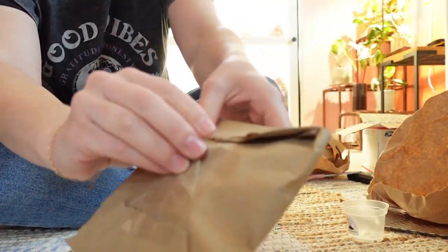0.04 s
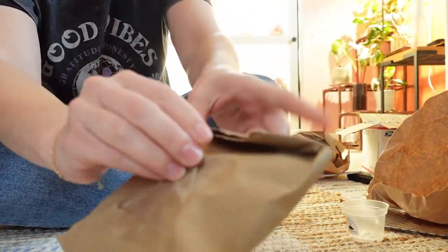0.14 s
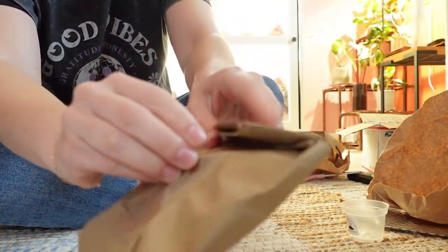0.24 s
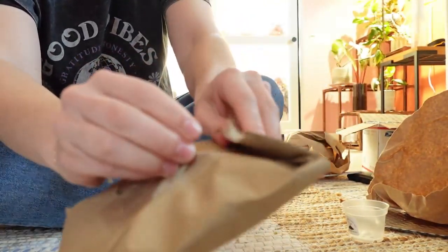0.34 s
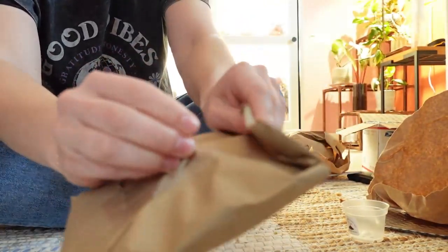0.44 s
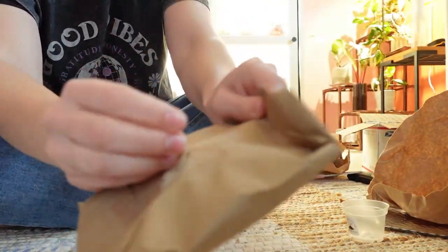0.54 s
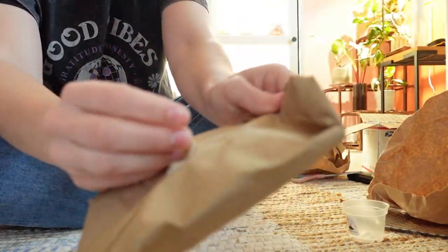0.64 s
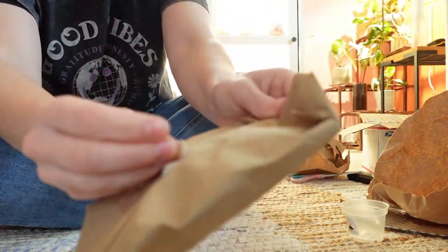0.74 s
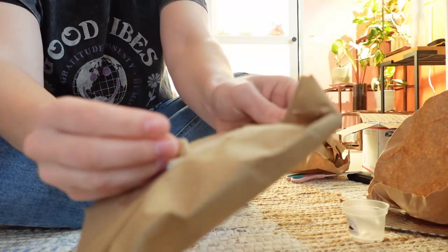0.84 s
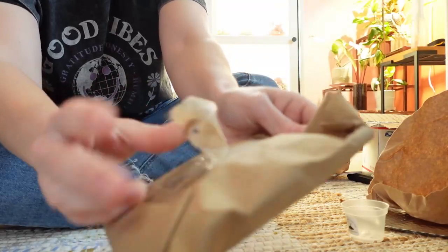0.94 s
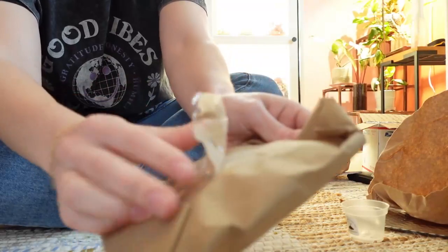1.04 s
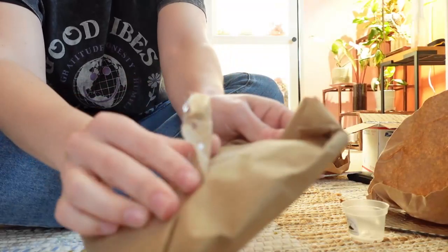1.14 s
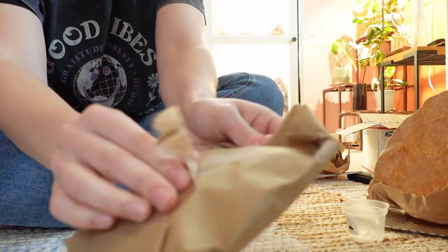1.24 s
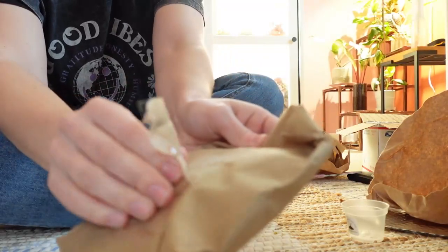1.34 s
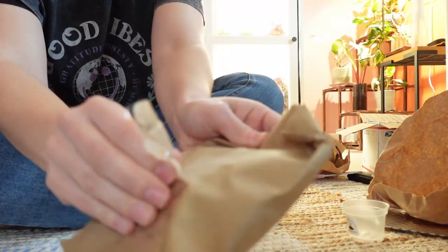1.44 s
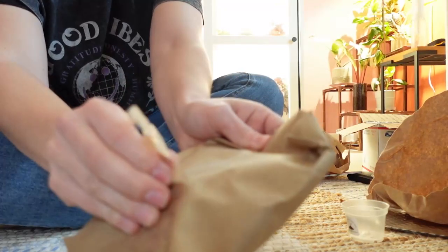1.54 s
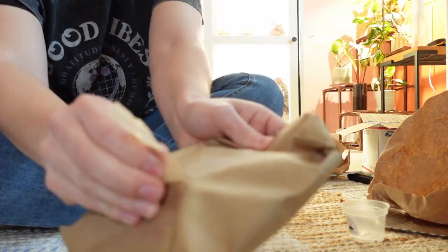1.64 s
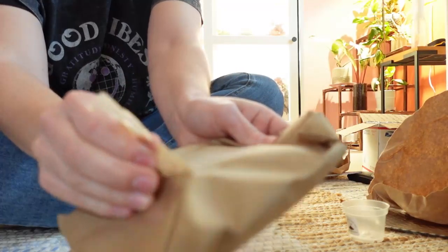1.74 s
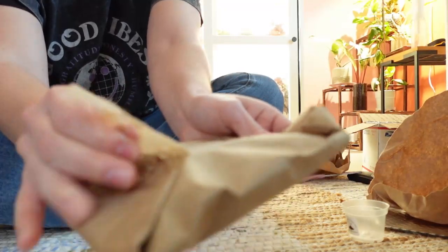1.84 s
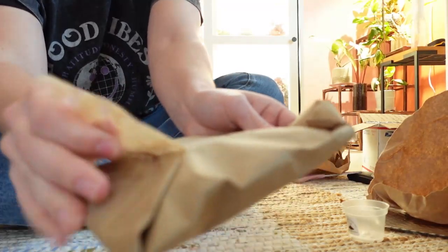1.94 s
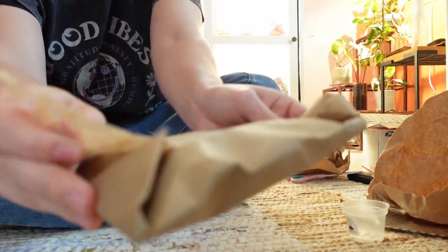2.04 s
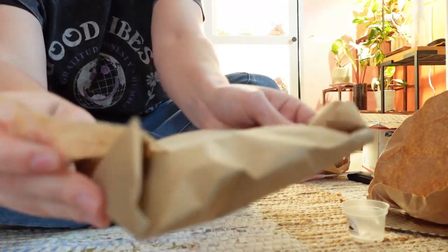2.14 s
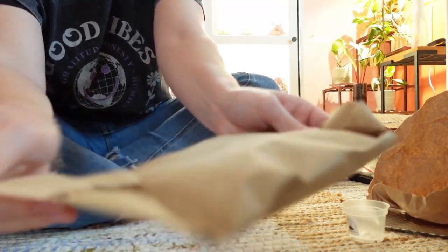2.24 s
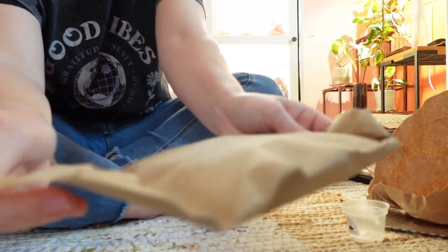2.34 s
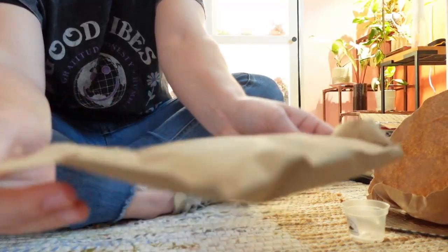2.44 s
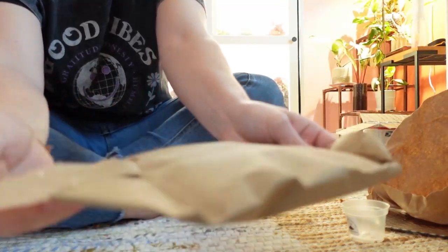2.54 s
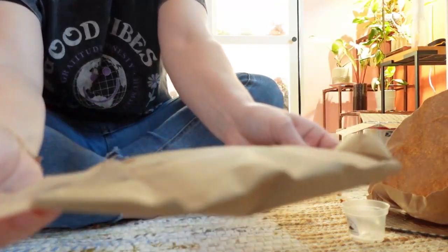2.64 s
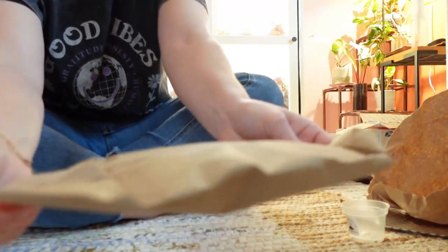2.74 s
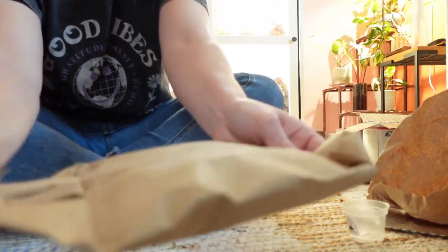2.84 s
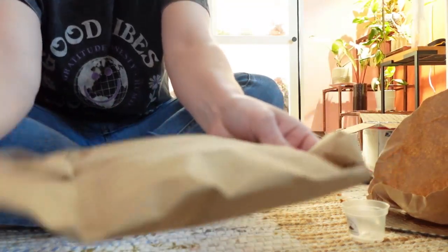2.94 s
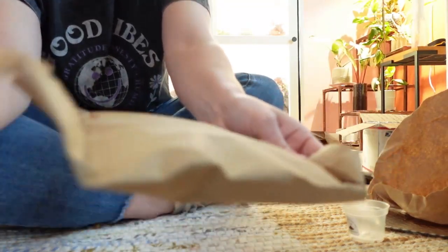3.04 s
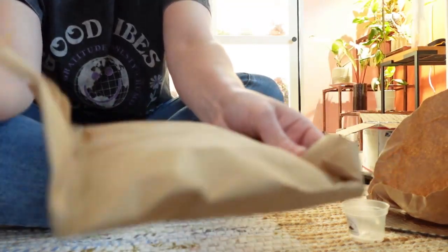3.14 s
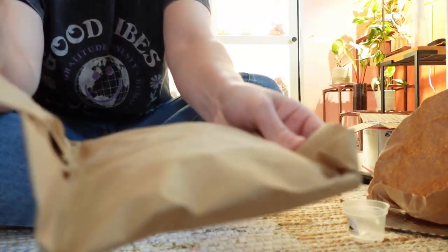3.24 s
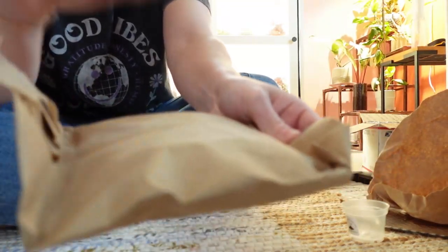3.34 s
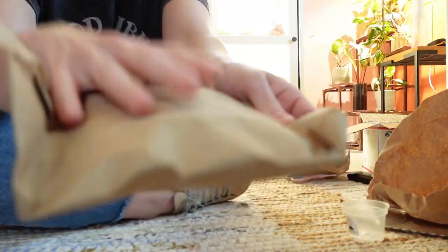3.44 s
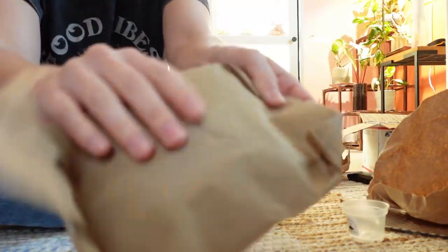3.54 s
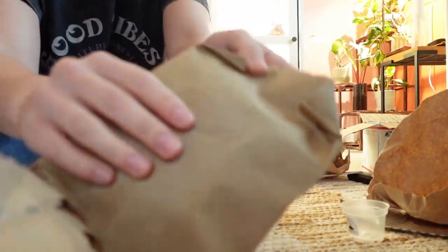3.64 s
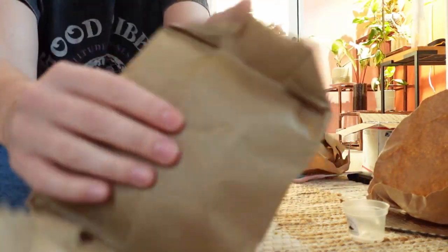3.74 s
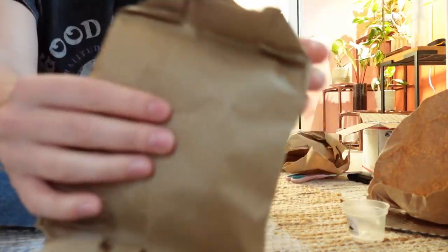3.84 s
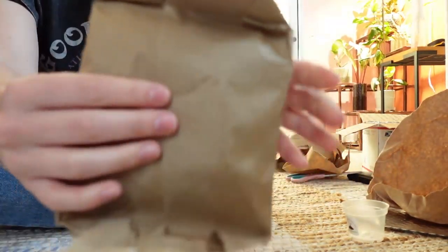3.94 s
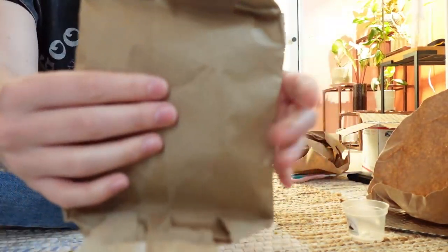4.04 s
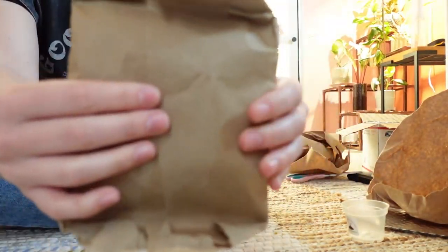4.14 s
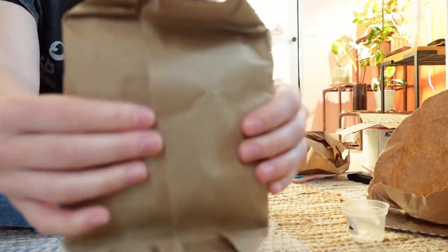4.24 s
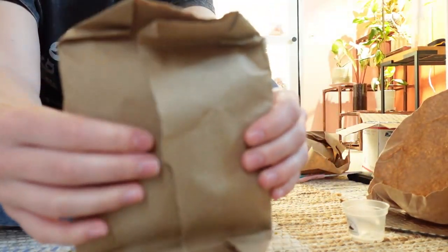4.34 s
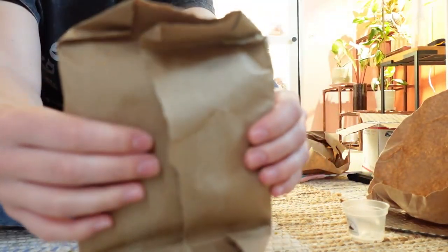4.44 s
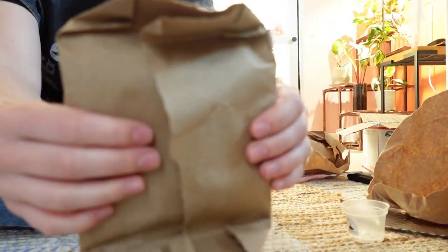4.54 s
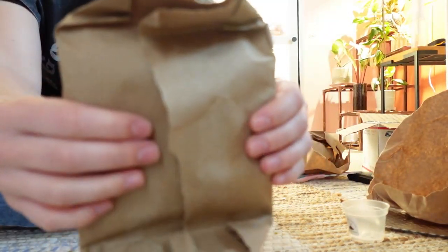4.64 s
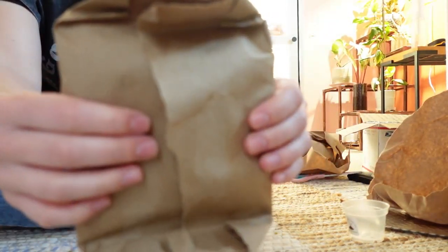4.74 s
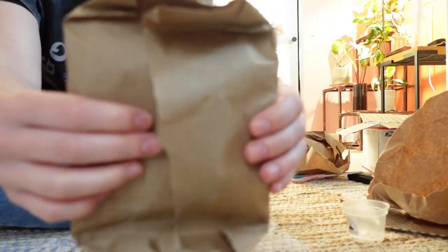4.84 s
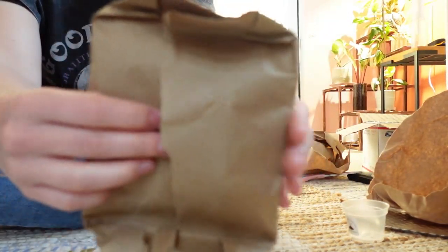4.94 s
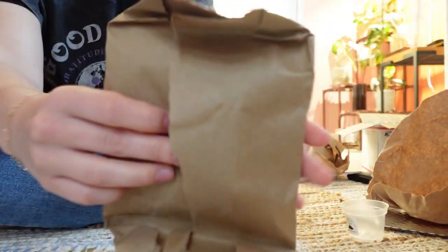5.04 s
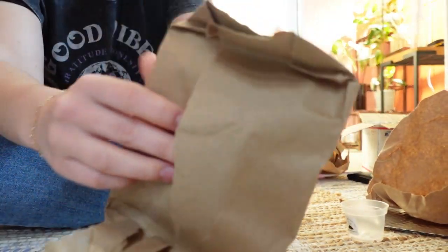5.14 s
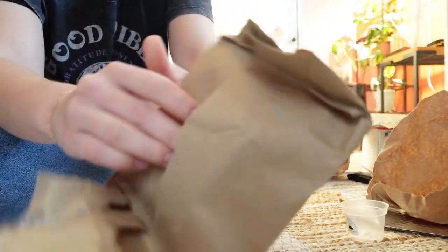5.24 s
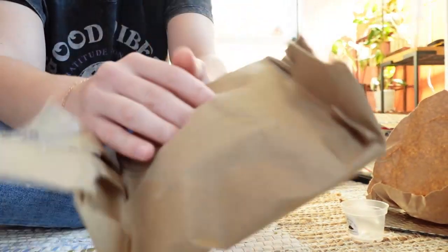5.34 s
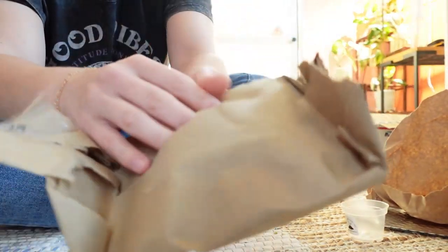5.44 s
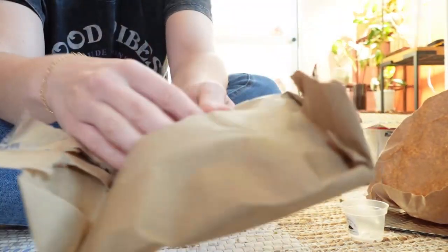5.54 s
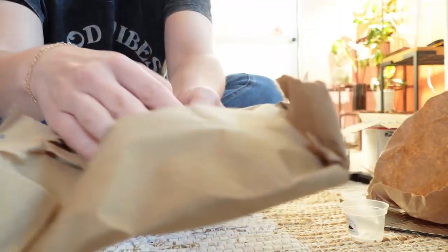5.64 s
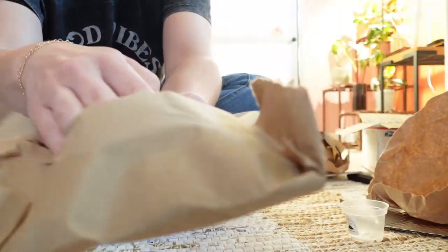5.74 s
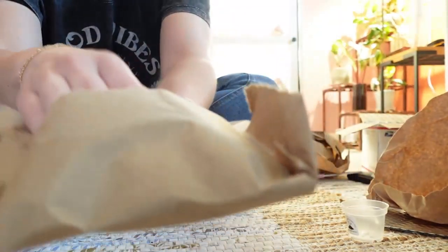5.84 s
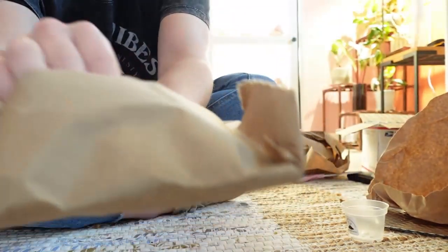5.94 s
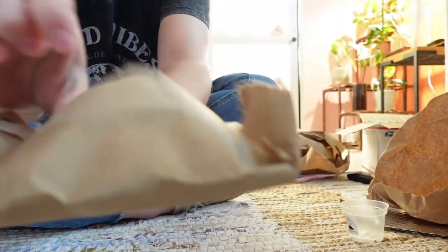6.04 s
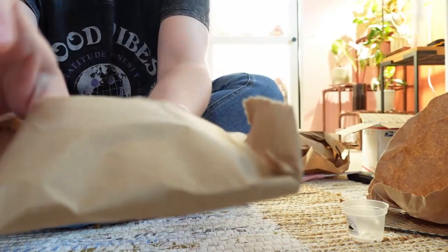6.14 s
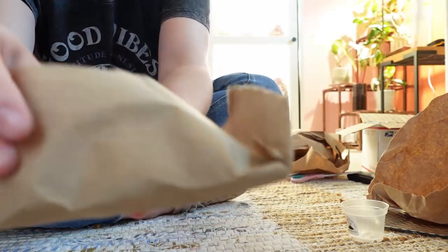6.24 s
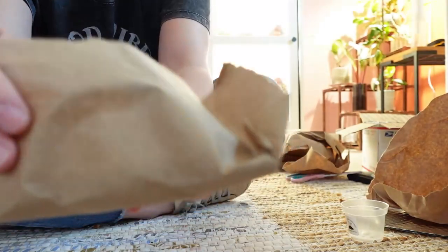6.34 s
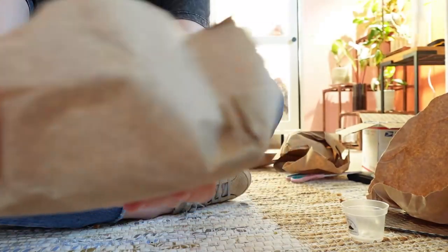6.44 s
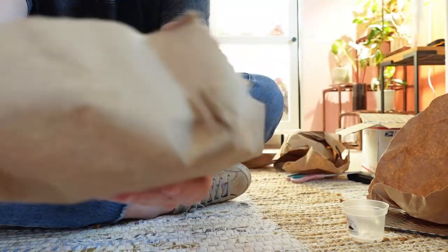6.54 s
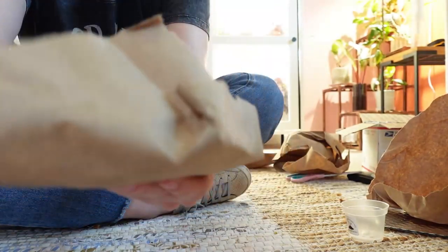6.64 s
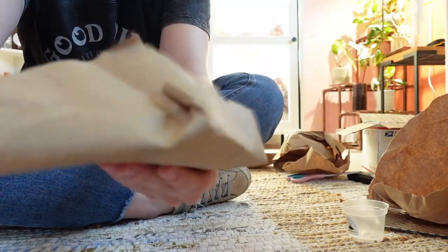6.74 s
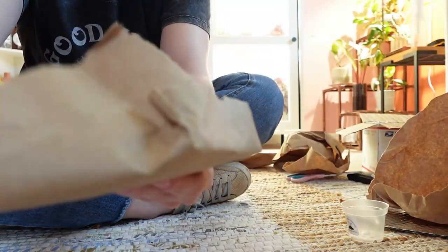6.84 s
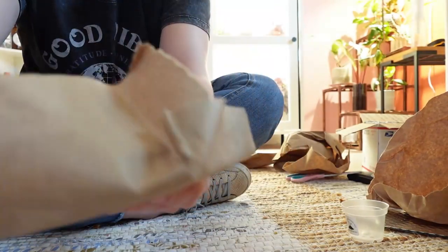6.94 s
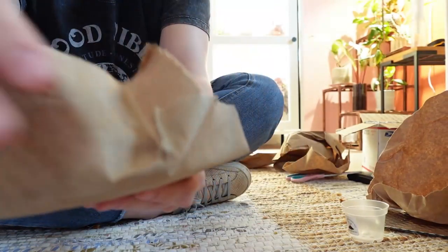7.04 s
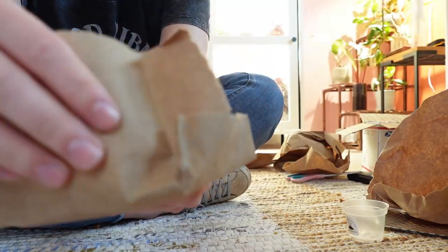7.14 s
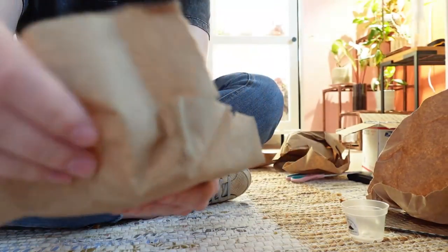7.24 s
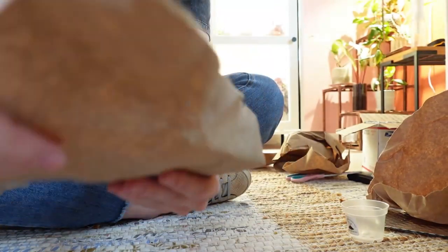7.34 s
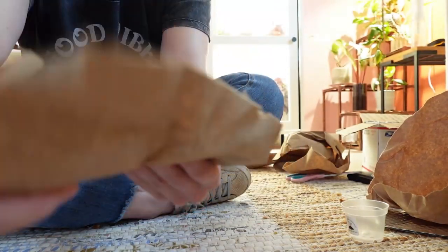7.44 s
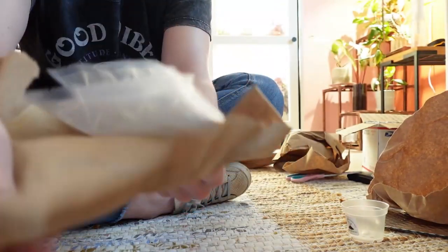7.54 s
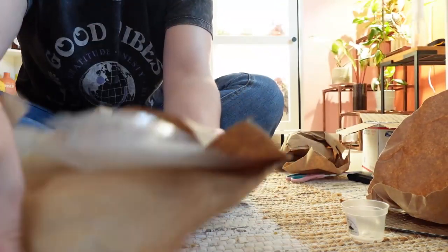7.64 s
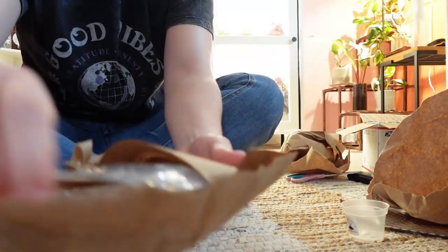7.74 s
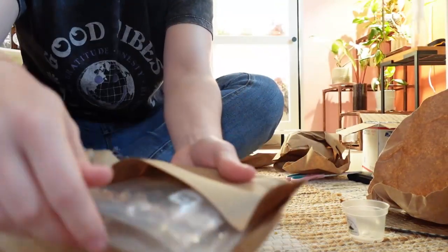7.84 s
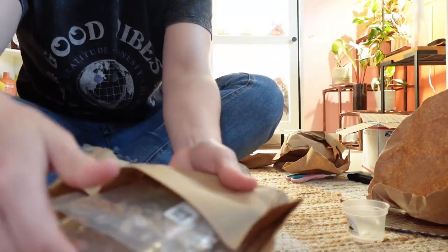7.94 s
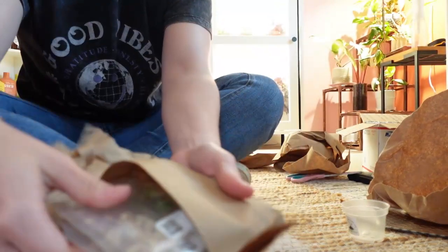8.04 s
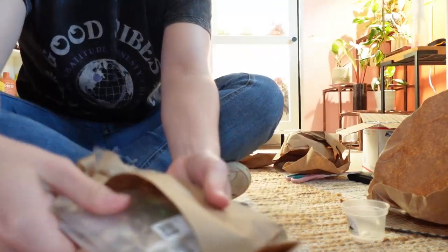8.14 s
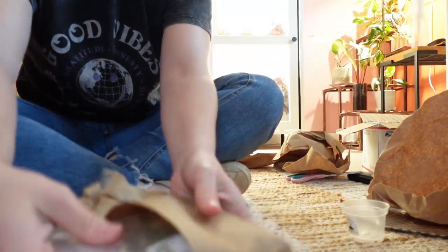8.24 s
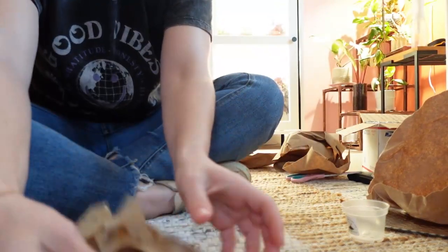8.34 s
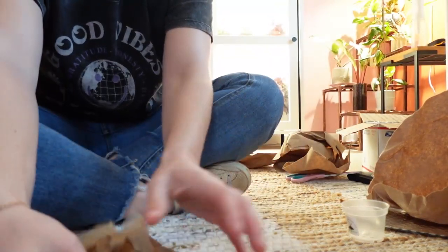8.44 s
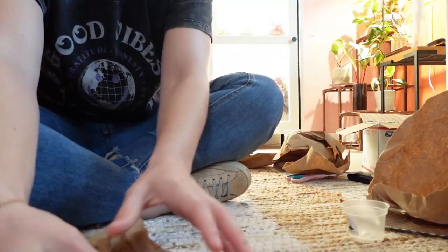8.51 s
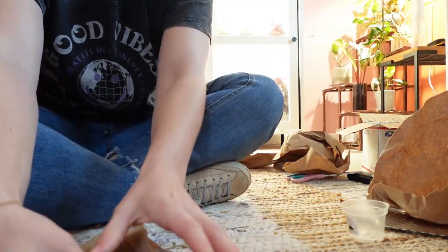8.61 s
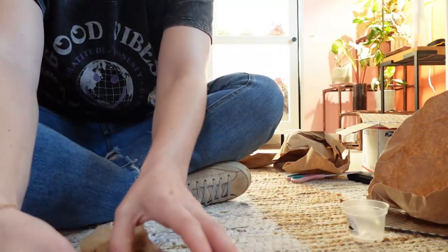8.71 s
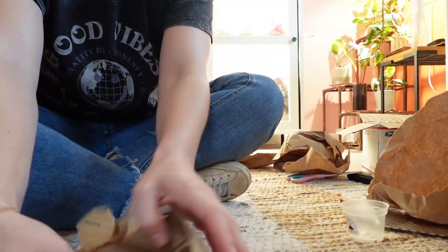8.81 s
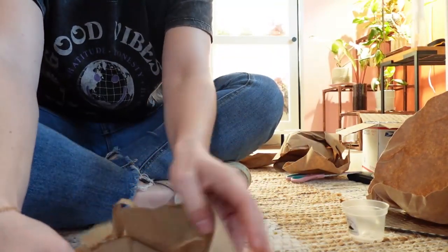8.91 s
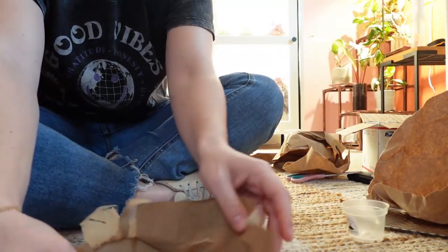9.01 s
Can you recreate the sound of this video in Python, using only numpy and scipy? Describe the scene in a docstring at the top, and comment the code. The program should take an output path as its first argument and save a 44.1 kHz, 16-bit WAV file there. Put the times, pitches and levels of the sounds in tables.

```python
"""A paper bag is handled close by in a quiet room: hands tear off a strip, turn the bag and pull it open.
Creases buckle in sharp snaps: kicks and short noise bursts that ring through filters.
Each move of the hands adds a rustle of tiny crackles and smooth sliding noise.
The tear is a dense stream of breaking fibres, with a broad ring that glides down.
The room adds a short, faint tail and still air."""
import sys
import numpy as np
from scipy import signal
from scipy.fft import rfft, irfft, next_fast_len
from scipy.io import wavfile
from scipy.ndimage import uniform_filter1d, map_coordinates

SR = 44100
rng = np.random.default_rng(int(sys.argv[2]) if len(sys.argv) > 2 else 0)


def write(x):
    x = np.atleast_2d(x).T
    wavfile.write(sys.argv[1], SR, np.round(np.clip(x, -1, 1) * 32767).astype(np.int16))


N = 400016  # length in samples
TIME = np.arange(N) / SR
TAPS = 2048  # length in samples of filters and short sounds
HZ = np.fft.rfftfreq(TAPS, 1 / SR)
LEAD = 128  # samples of lead-in before the kick


def amp(db):
    """Turns decibels into gain."""
    return 10 ** (np.asarray(db) / 20)


def evened(x):
    """Scales to rms 1."""
    return x / np.sqrt(np.mean(x ** 2) + 1e-20)


def read(points, hz):
    """Reads a table of values per frequency, in straight lines on a log-frequency axis."""
    f, value = np.transpose(points)
    return np.interp(np.log(hz + 1), np.log(f), value)


def add(mix, s, sound):
    """Mixes a sound in at s seconds."""
    part = mix[max(round(s * SR), 0):][:len(sound)]
    part += sound[:len(part)]


def coloured(x, gain):
    """Filters with the given gain at each of HZ, without pre-echo (minimum phase), so attacks stay sharp."""
    log_gain = np.log(np.r_[gain, gain[-2:0:-1]] + 1e-5)
    minimum_phase = np.exp(np.conj(signal.hilbert(log_gain)))
    taps = np.fft.ifft(minimum_phase).real
    return signal.oaconvolve(x, taps)[:len(x)]


def facet(hz, q):
    """Gain at each of HZ of one stiff patch of paper: a broad resonance."""
    return 1 / np.hypot(1, q * ((HZ + 1) / hz - hz / (HZ + 1)))


def buckle(t, flip_s=0.0013, shiver_db=-21, lead_db=-11):
    """Envelope of a crease that gives way at t = 0: a very short swell, a rattle, a weak shiver of the sheet."""
    lead_s, shiver_s = 0.0007, 0.005
    before = amp(lead_db) * np.exp(-abs(t) / lead_s)
    after = np.exp(-abs(t) / flip_s) + amp(shiver_db) * np.exp(-abs(t) / shiver_s)
    return np.where(t < 0, before, after)


# The creases that stand out. Each row: time of the flip in seconds, level over its first 5 ms in dB
# (before a trim shared by all), pitch in Hz of the paper facet that flips.
SNAPS = [(0.033, -16.5, 3240), (0.038, -15.5, 7000), (.063, -16.5, 2300), (0.075, -16, 2890),
         (0.0927, -19.5, 3400), (0.1043, -15, 5160), (0.121, -14, 6500), (0.1446, -14, 3880),
         (0.2125, -12.5, 2300), (0.2162, -14, 3830), (0.235, -16.5, 4700), (.2478, -22, 2600),
         (.282, -16.5, 7500), (0.305, -14, 4760), (.327, -17, 2880), (0.3858, -15.5, 1990),
         (0.415, -18.5, 1660), (0.4455, -22, 2700), (0.467, -19.5, 2800), (0.5346, -14, 4870),
         (.573, -13, 4100), (.584, -13.5, 4500), (0.617, -15, 2410), (.6269, -12.5, 6600),
         (.6763, -18, 3100), (0.6811, -13, 2600), (.718, -13.5, 3860), (0.8295, -15.5, 1490),
         (0.911, -17, 6100), (0.96, -12.5, 4050), (.967, -15, 2640), (0.981, -20, 4800),
         (1.0013, -14.5, 2970), (1.0752, -15.5, 4970), (1.0901, -24, 2200), (1.1266, -17.5, 3530),
         (1.2231, -19.5, 2460), (1.269, -24, 1700), (1.3256, -18.5, 9250), (1.333, -21, 5650),
         (1.3748, -21, 3370), (1.4779, -14, 2120), (1.508, -26, 1700), (1.533, -14, 3420),
         (1.619, -18, 5700), (1.642, -9.5, 3870), (1.6622, -13.5, 5400), (1.7385, -13, 3020),
         (1.767, -15, 6900), (1.7933, -14, 4100), (2.4103, -16.5, 3540), (2.421, -11.5, 5100),
         (2.4425, -16.5, 4660), (2.4568, -18.5, 1560), (2.539, -24, 2060), (2.5935, -23.5, 11300),
         (2.6292, -19.5, 2550), (2.6947, -14, 5450), (2.7504, -14.5, 3180), (2.8261, -16, 3400),
         (2.8842, -20, 2980), (2.8968, -15, 2400), (2.9745, -15.5, 3340), (3.018, -19, 6640),
         (3.0291, -14.5, 2070), (3.15, -17.5, 2690), (3.1659, -14, 3840), (3.186, -19, 6000),
         (3.192, -10, 4740), (3.211, -11.5, 7200), (3.5355, -14.5, 4000), (3.544, -15, 4160),
         (3.602, -18.5, 3000), (3.6347, -13.5, 3240), (3.65, -16.5, 2600), (3.675, -12.5, 4280),
         (3.69, -14, 4450), (3.7492, -12, 2670), (3.777, -14, 3500), (3.7925, -17.5, 3300),
         (3.8401, -10.5, 4280), (3.9847, -23.5, 3900), (4.0365, -23.5, 3850), (4.0753, -30, 3500),
         (4.22, -18.5, 4500), (4.2466, -16.5, 3800), (4.2863, -19, 3400), (4.3, -13, 3660),
         (4.329, -17.5, 2950), (4.361, -15.5, 2820), (4.447, -25.5, 3380), (4.5314, -19.5, 2120),
         (4.592, -32, 2700), (4.8026, -19.5, 2420), (4.8553, -24.5, 3100), (4.8794, -22, 2860),
         (4.9112, -16, 3900), (4.927, -14, 3900), (4.9428, -13.5, 4700), (5.0311, -17, 2670),
         (5.052, -21.5, 1930), (5.1381, -15, 3730), (5.1553, -17, 3400), (5.1637, -15, 3730),
         (5.2344, -21, 1880), (5.259, -18.5, 1390), (5.34, -13, 3930), (5.3627, -20, 3550),
         (5.3825, -22, 2700), (5.3992, -20, 3150), (5.578, -16, 1920), (5.5885, -14, 2210),
         (5.6793, -14, 3080), (5.6863, -14.5, 3000), (5.7439, -17.5, 2820), (5.8242, -13, 4650),
         (5.837, -10, 2940), (5.867, -11.5, 3340), (5.9518, -20, 1240), (6.0849, -9, 1390),
         (6.2635, -12.5, 3020), (6.3733, -12, 5660), (6.4318, -12.5, 2000), (6.4893, -16.5, 3500),
         (6.511, -12.5, 2830), (6.5574, -9.5, 3600), (6.635, -12.5, 3720), (6.669, -10, 2300),
         (6.7018, -14, 2300), (6.7108, -12.5, 2800), (6.7415, -12.5, 2400), (6.7483, -11, 3100),
         (6.8003, -10.5, 2530), (6.8257, -11.5, 4450), (6.8817, -18.5, 2100), (6.8868, -13.5, 1940),
         (6.9361, -10, 2500), (6.9552, -17, 2300), (7.099, -17.5, 1900), (7.107, -13, 5030),
         (7.118, -13.5, 2820), (7.1535, -10.5, 2230), (7.198, -10.5, 2250), (7.2122, -22, 2000),
         (7.2423, -10, 1960), (7.2523, -8.5, 5030), (7.3093, -14, 3100), (7.339, -16, 3700),
         (7.345, -10.5, 3700), (7.3643, -12, 3230), (7.3992, -10.5, 2620), (7.4146, -10, 5730),
         (7.4413, -14, 2700), (7.474, -12, 5300), (7.4906, -11, 3970), (7.5109, -12.5, 3400),
         (7.5447, -16.5, 4900), (7.6294, -15, 5300), (7.6412, -12, 4900), (7.6487, -13, 4500),
         (7.6575, -14, 2910), (7.6655, -12, 4800), (7.685, -13.5, 3720), (7.7205, -16, 2510),
         (7.73, -14.5, 2440), (7.7672, -15.5, 4000), (7.82, -14, 2520), (7.9564, -21.5, 5300),
         (8.0285, -14.5, 4150), (8.0508, -9.5, 2650), (8.0731, -10, 3860), (8.091, -15, 3950),
         (8.1145, -14, 3670), (8.1554, -7.5, 2600), (8.1815, -10, 2530), (8.2564, -15.5, 4400),
         (8.2632, -11, 3960), (8.296, -17, 3900), (8.327, -15, 3380), (8.4386, -24, 3320),
         (8.4825, -11.5, 1920), (8.4926, -13, 2290), (8.514, -16, 2670), (8.574, -27, 3200),
         (8.6516, -23, 5500), (8.6726, -24, 5150), (8.7175, -20.5, 2860), (8.739, -20, 2820),
         (8.7674, -23, 1520), (8.7727, -27, 3100), (8.819, -23.5, 2450), (8.903, -17.5, 2500),
         (8.9307, -12, 3040), (9.0007, -18.5, 2820), (9.0514, -15.5, 5000)]
# The colour that the bag gives every snap. Each row: frequency in Hz, gain in dB.
BAG_COLOUR = [(60, 6.5), (130, 16.5), (330, 15), (480, 12.5), (720, 8), (1400, 7.5), (3000, 1.5),
              (15000, -4.5)]
# A snap slips twice: the second kick lies at most this far from the main flip, and is weaker
STUTTER_S, STUTTER_DB = 0.0012, -3.5


def snaps(kick=2.1, q=0.87, q_rise=0.4, steep=1.63, ring_db=2.5, grow=0.49, level_db=-1.25,
          usual_db=-17.0, usual_hz=3200, bass_hz=500, size=30):
    """Each large crease kicks its own facet, which rings briefly at a few irregular pitches."""
    out = np.zeros(N)
    first = round(0.005 * SR)  # the stretch that sets the level
    stutter = np.clip(STUTTER_S * SR, 0, LEAD)
    for s, db, hz in SNAPS:
        # a loud crease takes longer to give way; a small, high facet flips fast
        speed = hz / usual_hz / amp(grow * (db - usual_db))
        push = rng.standard_normal(TAPS) * buckle((np.arange(TAPS) - LEAD) / SR * speed)
        push[LEAD] += kick * rng.choice([-1, 1])
        second = LEAD + round(stutter * rng.uniform(-1, 1))
        push[second] += kick * amp(STUTTER_DB) * rng.choice([-1, 1])
        # random bumps along the frequency axis
        rings = evened(signal.convolve(rng.standard_normal(len(HZ)), np.hanning(size), "same"))
        # paper is too light to push air: a large, low facet gives hardly more bass than a usual one
        light = min(hz / usual_hz, 1) ** (2 / (1 + (HZ / bass_hz) ** 4))
        resonance = facet(hz, q * speed ** q_rise) ** steep
        snap = coloured(push, light * resonance * amp(read(BAG_COLOUR, HZ) + ring_db * rings))
        loudness = np.std(snap[LEAD:][:first])
        add(out, s - LEAD / SR, amp(db + level_db) * snap / loudness)
    return out


def crackle(per_s, spread_db, lean, q=1.32, count=16):
    """Tiny creases of many pitches give way at random, a few much larger; lean favours the low ones."""
    out = np.zeros(N)
    for hz in np.geomspace(800, 13000, count):
        at = rng.integers(0, N, int(per_s * N / SR / count))
        size_db = spread_db * np.minimum(rng.exponential(1, len(at)), 3)
        power = np.bincount(at, amp(size_db) ** 2, N)
        # high creases are over sooner
        grain = buckle((np.arange(TAPS) - LEAD) / SR * np.sqrt(hz / 2000))
        envelope = np.sqrt(abs(signal.oaconvolve(power, grain ** 2)[:N]))
        bursts = rng.standard_normal(N) * envelope
        out += coloured(bursts, facet(hz, q)) / hz ** lean
    return evened(out)


def catching(depth_db, catch_s):
    """Gain of paper that catches and slips instead of moving evenly: smoothed random ups and downs."""
    wander = uniform_filter1d(rng.standard_normal(N), max(round(catch_s * SR), 1))
    return amp(depth_db * evened(wander))


# Every move swells quickly, is held and lets go; the sheet then settles quietly
SWELL_DB_PER_S, RELEASE_DB_PER_S = 709, 215
SETTLE_DB, SETTLE_DB_PER_S = -7.5, 84


def move(start, length):
    """Gain over time of one move of the hands: swell, hold, release, settling."""
    until = np.maximum(start - TIME, 0)
    since = np.maximum(TIME - start - length, 0)
    fall_db = np.maximum(-RELEASE_DB_PER_S * since, SETTLE_DB - SETTLE_DB_PER_S * since)
    return amp(np.maximum(fall_db - SWELL_DB_PER_S * until, -200))


# The moves of the hands: picking at the folded top, laying the strip aside and turning the bag over,
# shifting the grip, pulling the bag open, setting it down.
# Each row: start in seconds, length held in seconds, rustle level in dB (before the grip wavers),
# brightness in dB per octave.
STROKES = [ (0.0, 0.16, -26, 0.5), (0.236, 0.13, -25.5, -.2), (0.375, 0.1, -28, 0.5),
           (0.52, 0.084, -24.5, 2), (.6, 0.087, -19, 1.1), (0.774, .072, -20.5, 2), (0.935, 0.022, -23, 1),
           (1.101, 0.034, -32, -0.5), (1.218, 0.075, -31, -0.4), (1.38, .048, -37.5, 1),
           (1.445, 0.058, -29.5, 0.8), (1.543, 0.054, -25, 1.5), (2.388, 0.04, -27.5, -2),
           (2.543, .04, -37.5, -1), (2.667, 0.061, -22, 1.1), (2.755, 0.078, -33.5, 0),
           (2.894, 0.029, -28.5, -1), (2.95, 0.01, -26, 0.5), (3.027, 0.0099, -23, -1.5),
           (3.153, 0.073, -37.5, -2), (3.45, .12, -42.5, 2), (3.548, 0.093, -22.5, 0.5),
           (3.695, .12, -27.5, -.5), (3.808, 0.018, -21.5, 0), (3.876, 0.093, -35.5, 0),
           (4.146, 0.016, -35.5, 1.5), (4.221, 0.13, -27, -.5), (4.422, 0.045, -33.5, -1.1),
           (4.545, .073, -47, 0.5), (4.873, 0.2, -33, 0.5), (5.097, 0.12, -29.5, -1),
           (5.23, 0.2, -35, -0.8), (5.493, .097, -30, 0), (5.575, 0.04, -24, -1),
           (5.669, 0.099, -26.5, -0.5), (5.87, 0.024, -23.5, 0), (5.955, .098, -35.5, -1),
           (6.022, 0.38, -27.5, -0.3), (6.069, 0.039, -16.5, -1.3), (6.333, 0.049, -19, -0.5),
           (6.401, 0.2, -21, -1.8), (6.446, .014, -17, -1.5), (6.573, 0.24, -19, -2),
           (6.774, 0.024, -17, -1), (6.865, 0.24, -26.5, -1), (7.108, 0.05, -26.5, -1.5),
           (7.195, .11, -24.5, -1.3), (7.324, 0.028, -19.5, 0.5), (7.389, .14, -20, -1.4),
           (7.609, 0.085, -23, -0.2), (7.718, 0.057, -22, -1.5), (7.912, 0.067, -27, -1),
           (8.04, 0.17, -24, -1), (8.212, 0.16, -28, -1.1), (8.435, 0.037, -19.5, -2.5),
           (8.545, 0.13, -34, -1), (8.73, 0.16, -35, -2.5), (8.884, 0.17, -26.5, -0.5),
           (8.92, 0.013, -22.5, -1.5)]


def handwork():
    """Gain and brightness of the rustle: the strongest move leads, and the grip is never quite steady."""
    effort, tilt = np.zeros(N), np.zeros(N)
    for start, length, db, bright in STROKES:
        gain = amp(db) * move(start, length)
        tilt[gain > effort] = bright
        effort = np.maximum(effort, gain)
    return effort * catching(depth_db=1.5, catch_s=0.012), tilt


# Slow changes in the low part of the rustle and tear.
# Each row: time in seconds, boost of the lows in dB (before the power is evened out).
BODY = [(0.2, 4), (3.0, 3.5), (3.8, -2.5), (5.9, -3), (6.7, 0.5), (7.3, 2), (8.2, 4)]


def flexed(x, colour, tilt, patchy_db, pivot_hz=2700, body_hz=650):
    """A bending sheet: its colour shifts from moment to moment and its brightness follows tilt, at equal power."""
    painted = evened(coloured(x, amp(read(colour, HZ))))
    hz, t, z = signal.stft(painted, SR, nperseg=256)
    octave = np.log2(np.maximum(hz, 200) / pivot_hz)[:, None]
    # random patches, two to the octave, that drift over time
    patches = evened(uniform_filter1d(rng.standard_normal((20, len(t))), size=5))
    spots = np.broadcast_arrays(2 * octave + 10, np.arange(len(t)))
    shift = map_coordinates(patches, spots, order=1)
    body = np.interp(t, *np.transpose(BODY)) / (1 + (hz[:, None] / body_hz) ** 4)
    gain = amp(octave * np.interp(t, TIME, tilt) + body + patchy_db * shift)
    # keep the power the same at every moment
    gain /= np.sqrt(np.average(gain ** 2, axis=0, weights=amp(read(colour, hz)) ** 2))
    return signal.istft(z * gain, SR)[1][:N]


# The colour of paper rubbing on paper. Each row: frequency in Hz, gain in dB.
RUB_COLOUR = [(50, -40), (150, -18.5), (300, -7), (950, -4.5), (1400, -1.5), (2400, -2.5), (5000, -2),
              (9000, -7.5), (15500, -14)]


def rubbing(slide_db=-2.0, press=0.31, usual_db=-28):
    """Sheets rub under the moving hands: fine crackle mixed with smooth sliding noise."""
    effort, tilt = handwork()
    # the harder the sheets are pressed together, the more they slide rather than tick
    slide = amp(slide_db) * np.maximum(effort / amp(usual_db), 1) ** press
    ticks = crackle(per_s=600, spread_db=4.5, lean=0.13)
    mixed = (ticks + slide * rng.standard_normal(N)) / np.hypot(1, slide)
    return effort * flexed(mixed, RUB_COLOUR, tilt, patchy_db=2.0)


# The strip rings lower as it grows during the tear
TEAR_S, STRIP_HZ = (1.83, 2.39), (1860, 1120)  # start and end


def strip(x, width_hz=600):
    """The freed strip: one broad resonance that glides down as the tear runs on."""
    turn = np.exp(2j * np.pi * np.cumsum(np.interp(TIME, TEAR_S, STRIP_HZ)) / SR)
    r = np.exp(-np.pi * width_hz / SR)
    # shift the gliding pitch to zero, smooth, and shift it back
    return 2 * (turn * signal.lfilter([1 - r], [1, -r], x / turn)).real


# The strip comes away in pulls. Each row: start in seconds, length held in seconds, level in dB,
# ring of the freed strip in dB (its gain when added to the fibres).
PULLS = [(1.644, 0.14, -19.5, -10), (1.817, 0.07, -15.5, 1.5), (1.877, .06, -20, 7), (1.981, 0.22, -16, -6),
         (2.194, 0.15, -14, -5.5)]
# The colour of paper tearing. Each row: frequency in Hz, gain in dB.
RIP_COLOUR = [(70, -38), (220, -5.5), (450, -10.5), (900, -9), (1600, -5), (5500, 0), (9000, -3.5),
              (15500, -4.5)]


def tearing():
    """Dense fibre breaks follow each pull and make the strip ring."""
    pulls = np.array([amp(db) * move(start, length) for start, length, db, _ in PULLS])
    ring_db = np.transpose(PULLS)[3][pulls.argmax(axis=0)]  # the strongest pull decides
    fibres = crackle(per_s=3600, spread_db=1, lean=0) * catching(depth_db=0.5, catch_s=0.0036)
    ringing = fibres + amp(ring_db) * strip(fibres)
    ripping = flexed(ringing, RIP_COLOUR, np.zeros(N), patchy_db=1)
    # the fibre sound fades fast once the strip is free
    attached = amp(-RELEASE_DB_PER_S * np.maximum(TIME - TEAR_S[1], 0))
    return attached * pulls.max(axis=0) * ripping


# How far snaps differ between the two sides. Each row: frequency in Hz, gain in dB on top of the spread.
SPOT = [(1400, -14), (3000, 0), (13000, -3)]


def off_centre(x, spread_db=-22, hop_s=0.02):
    """A randomly wandering phase makes the snaps a little louder or earlier on one side."""
    a, b = (evened(uniform_filter1d(row, round(hop_s * SR))) for row in rng.standard_normal((2, N)))
    turn = np.exp(1j * np.arctan2(a, b))
    side = amp(spread_db) * (signal.hilbert(x, next_fast_len(N))[:N] * turn).real
    side = coloured(side, amp(read(SPOT, HZ)))
    return np.array([side, -side])


# Gain of the left-right difference at each frequency. Each row: frequency in Hz, gain in dB.
WIDTH = [(60, -15.5), (950, -20.5), (1600, -47), (2400, -20.5), (6000, -14.5), (9300, -16.5), (11000, -56)]


def microphones(mid, sideways, smear_s=0.0028, turn_hz=3):
    """A nearly mono pair: a phase-smeared copy and separate ambience are added left and taken from the right."""
    burst = rfft(rng.standard_normal(TAPS) * np.exp(-np.arange(TAPS) / SR / smear_s))
    smear = np.roll(irfft(burst / abs(burst)), TAPS // 2)  # shifts phases, keeps the colour
    smeared = signal.hilbert(signal.oaconvolve(mid, smear, "same"), next_fast_len(N))[:N]
    # the phase of the copy turns steadily
    turning = (smeared * np.exp(2j * np.pi * turn_hz * TIME)).real
    side = coloured(turning + sideways, amp(read(WIDTH, HZ)))
    return np.array([mid + side, mid - side])


# How long the room rings. Each row: frequency in Hz, time in seconds to fall by 60 dB.
ROOM_DECAY = [(3000, 0.44), (14000, 0.28)]


def room(x, onset_s=0.0037):
    """Diffuse tail of decaying noise that builds up as the walls answer and dies sooner in the treble."""
    hz, t, z = signal.stft(rng.standard_normal(SR // 2), SR, nperseg=256)
    decay = amp(-60 * t / read(ROOM_DECAY, hz)[:, None])
    build_up = np.minimum(t / onset_s, 1) ** 2
    tail = signal.istft(z * (decay * build_up), SR)[1]
    return signal.oaconvolve(x, tail / np.linalg.norm(tail))[:N]


# The colour of the still room. Each row: frequency in Hz, gain in dB before the hush is set to its level.
HUSH_COLOUR = [(30, -2), (250, 18), (1500, 6), (15000, -8)]


def ambience(x, hush_db=-62):
    """One independent share of the room sound: a tail and the still air, as coloured noise."""
    hush = evened(coloured(rng.standard_normal(N), amp(read(HUSH_COLOUR, HZ))))
    return room(x) + amp(hush_db) * hush


def scene(snap_room_db=-16, rustle_room_db=-19, sideways_db=6):
    """The bag right in front, the room from all around."""
    sharp = snaps()
    soft = rubbing() + tearing()
    to_room = amp(snap_room_db) * sharp + amp(rustle_room_db) * soft
    front = sharp + soft + ambience(to_room)
    sideways = amp(sideways_db) * ambience(to_room)
    return microphones(front, sideways) + off_centre(sharp)


def record(dry, ceiling=0.84, low_cut_hz=72, edge_hz=15750):
    """The tallest peaks are rounded off; then a low cut and an upper band limit."""
    rounded = dry / (1 + (dry / ceiling) ** 4) ** 0.25
    low_cut = signal.butter(2, low_cut_hz, "highpass", fs=SR, output="sos")
    thinned = signal.sosfilt(low_cut, rounded)
    band_limit = signal.firwin(255, edge_hz, window=("kaiser", 8), fs=SR)
    return signal.oaconvolve(thinned, band_limit[None], "same")


dry = scene()
out = record(dry)
write(out)
```